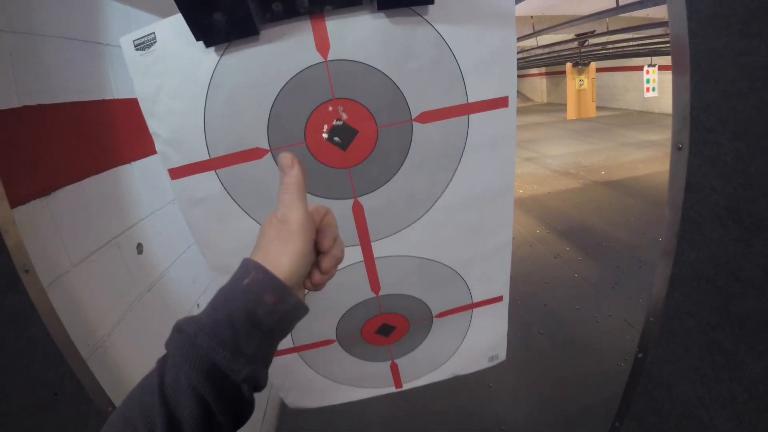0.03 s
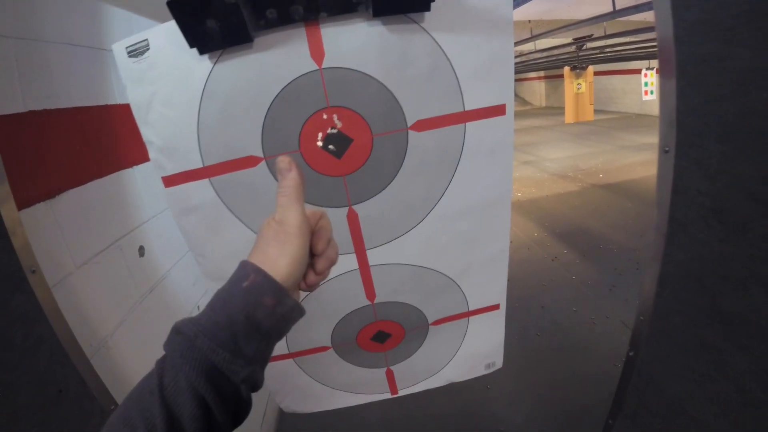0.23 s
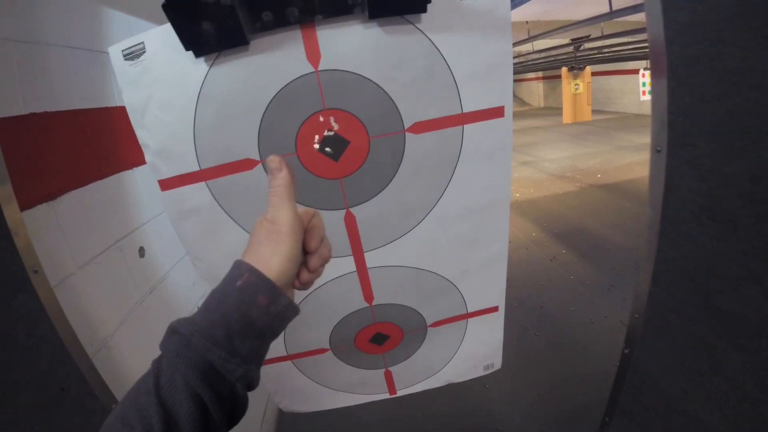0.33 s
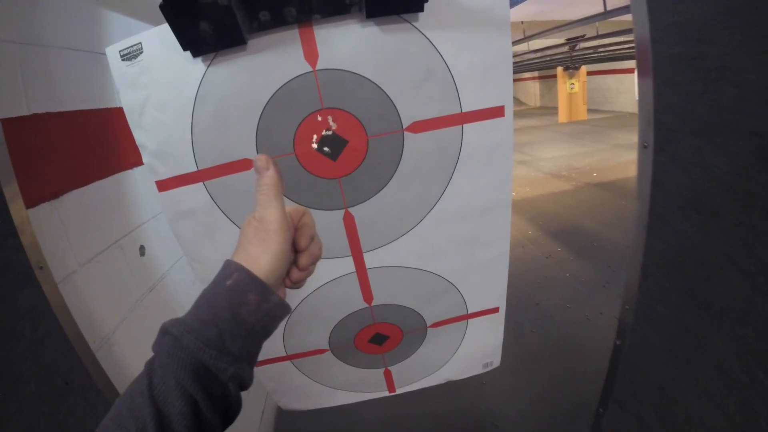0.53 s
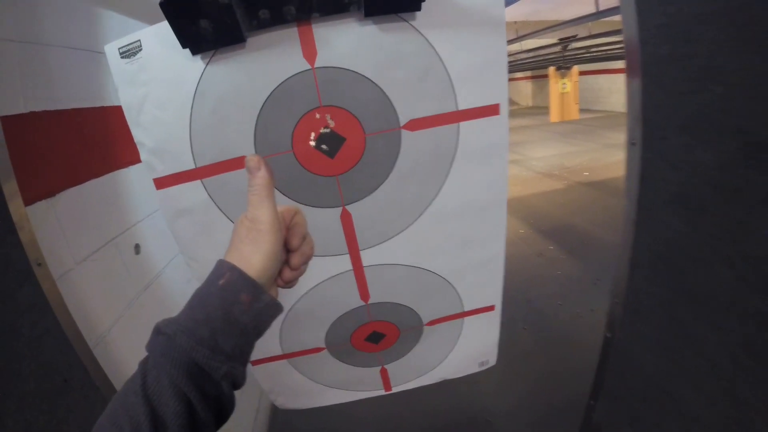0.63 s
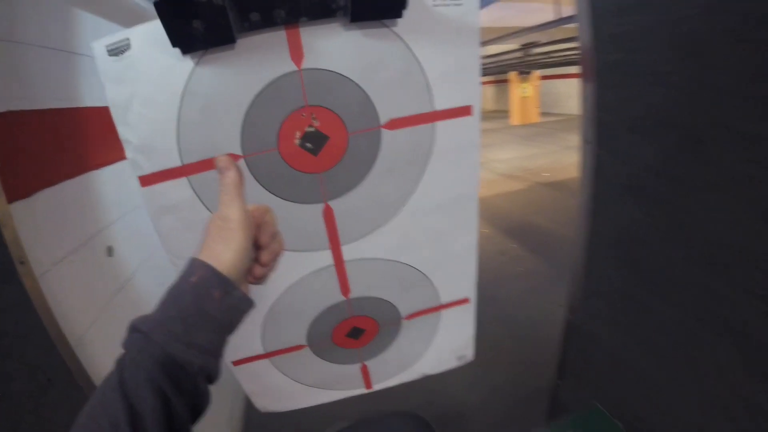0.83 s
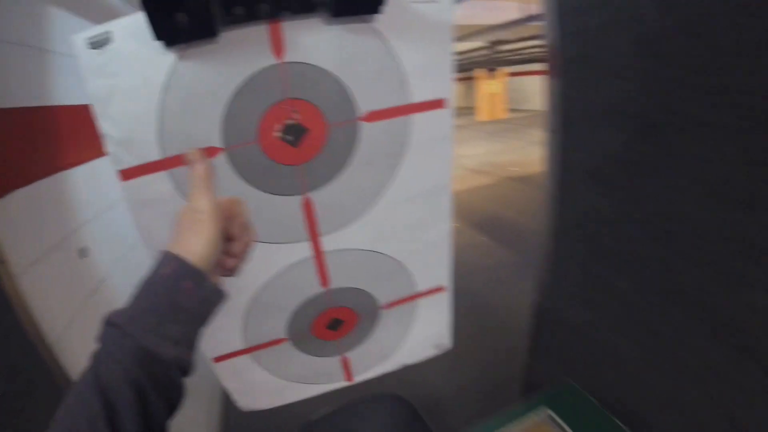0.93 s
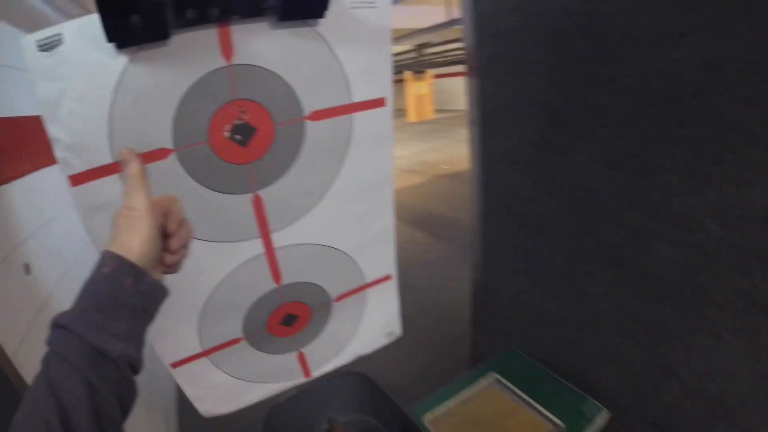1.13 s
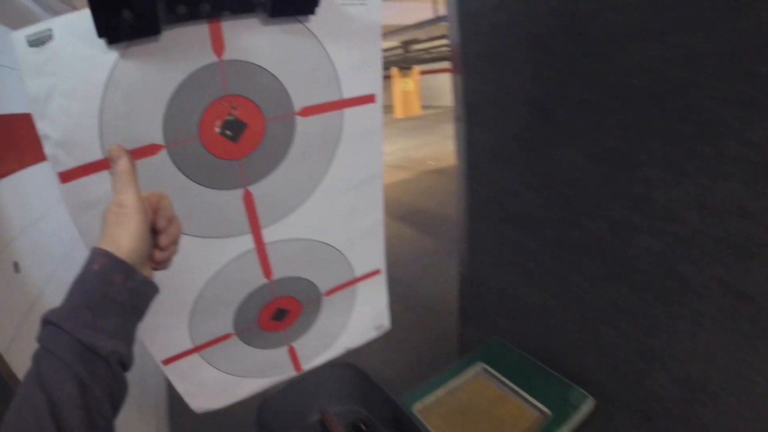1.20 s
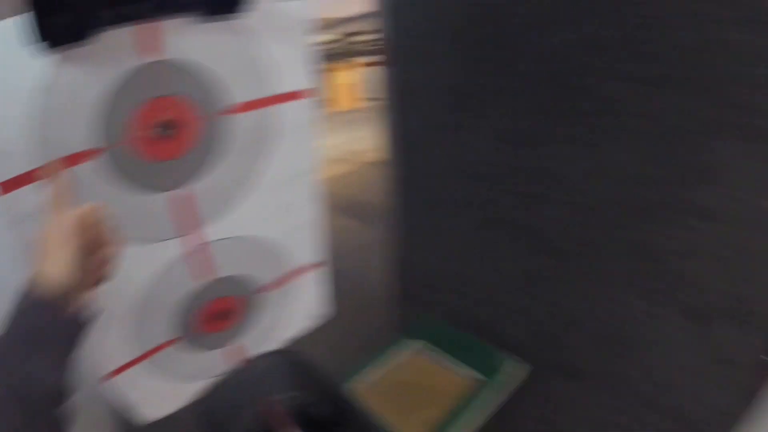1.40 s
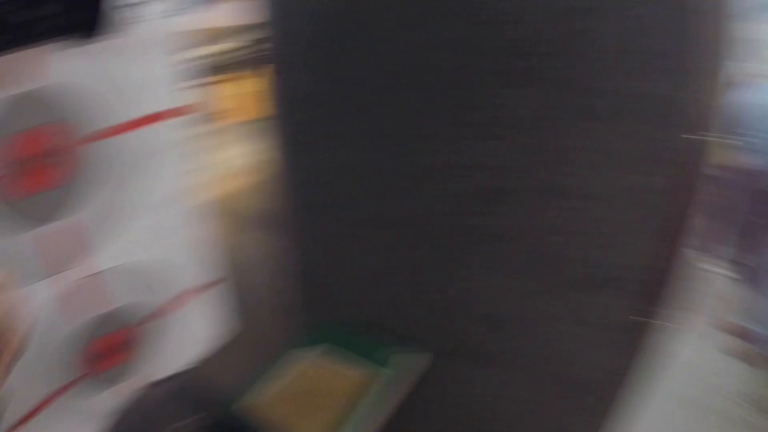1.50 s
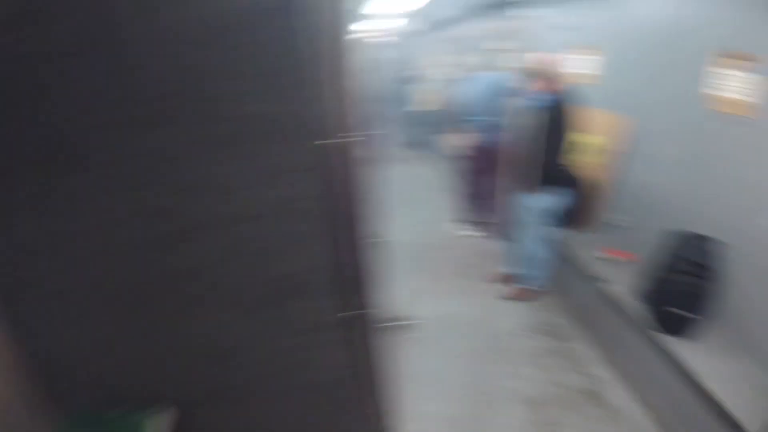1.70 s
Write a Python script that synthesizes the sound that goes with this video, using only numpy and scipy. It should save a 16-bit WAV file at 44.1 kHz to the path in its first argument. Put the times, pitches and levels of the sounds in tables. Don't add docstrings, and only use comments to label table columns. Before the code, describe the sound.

Single gunshot in an echoing indoor shooting hall, heard on a small camera: first low air rumble, faint motor whine and metallic clacks, then a hard click, the blast, wall echoes and a long fading tail.

```python
import sys
import numpy as np
from scipy import signal
from scipy.io import wavfile
from scipy.ndimage import uniform_filter1d

SR = 44100
rng = np.random.default_rng(int(sys.argv[2]) if len(sys.argv) > 2 else 0)


def decibels_to_gain(level_db):
    exponent = np.asarray(level_db, float) / 20
    return 10 ** exponent


def inscribe(sig):
    pcm = np.round(np.clip(np.atleast_2d(sig).T, -1, 1) * 32767)
    wavfile.write(sys.argv[1], SR, pcm.astype(np.int16))


N = 77175

# (frequency [Hz], level [dB per Hz])
VENTILATION = [(25, 6), (55, 6.5), (95, -4.5), (170, -15.5), (330, -29), (1000, -30), (3900, -44),
               (16000, -72)]
# (time [s], level [dB])
DRAUGHT = [(0, 2), (.11, -6.5), (.22, 3.5), (.38, -3.5), (.49, 2.5), (.58, -5), (.68, 0.5), (.73, -0.5),
           (1.4, -1.5), (1.7, 7.5)]
# (time [s], level [dB])
DRIVE_LOAD = [(0.0, -53.5), (0.076, -57.5), (0.146, -62), (0.208, -56), (0.23, -61), (0.328, -52),
              (0.506, -60.5), (0.542, -51.5), (0.74, -59)]
# (multiple of the fundamental [1], level [dB])
WHINE_PARTIALS = [(1, 2), (2, -7.5), (3, -30.5)]
# (multiple of the fundamental [1], level [dB])
SQUEAK_PARTIALS = [(.2, -53), (1, -52.5), (2, -56.5), (3, -58.5)]
# (time [s], level [dB])
CLACKS = [
    (0.0478, -23),
    (0.188, -31.5),
    (0.249, -31.5),
    (0.36, -18.5),
    (0.492, -33),
    (0.6823, -27),
]
# (frequency [Hz], level [dB], decay t60 [s])
CARRIER_MODES = [(1138, 3.5, 0.077), (1110, -14, 0.056), (1943, 0, 0.081), (2040, -3, 0.053),
                 (2436, -4, .05), (2790, -3.5, 0.038), (3430, -8, 0.074), (5580, -14, 0.032),
                 (6255, -4, .05), (10900, -48, 0.027)]
# (time [s], level [dB], share of dull knock [1])
LATCH_TICKS = [
    (.5975, -42, 0),
    (.6202, -17, .03),
    (.6211, -7, .04),
    (.6222, -20, .02),
    (.6239, -13, .08),
    (.6255, -5, .12),
    (.6272, -15, .08),
    (.6303, -15, 1.1),
]
# (frequency [Hz], level [dB], decay t60 [s])
LATCH_MODES = [(3050, -9, .004), (4640, -12, .004), (5360, -3, .005), (5950, -1, .005), (8150, -1, .004),
               (9780, -6, .003), (11600, -5, .003), (13400, -4, .003), (15000, -10, .003)]
# (frequency [Hz], level [dB], decay t60 [s])
KNOCK_MODES = [(922, -3.5, 0.025), (1290, -4, 0.011), (1900, -18, 0.0055)]
# (time [s], level [dB])
SPRING_SETTLE = [
    (.633, -63),
    (.651, -45.5),
    (0.655, -50),
    (.659, -44.5),
]
# (frequency [Hz], level [dB], decay t60 [s])
BLAST_BOOM = [(59.5, 10, 0.48), (80.6, 6.5, 0.31), (110.3, 1, 0.27), (150, 0, 0.22), (300.5, 2.5, 0.65)]
# (frequency [Hz], level [dB], decay t60 [s])
RETURN_BOOM = [(72.4, 1.5, 0.41), (119.7, 6, .6), (149.1, 7.5, 0.85), (185, -9, 0.36), (252.8, 5.5, 0.55),
               (329.7, 3.5, .4)]
# (frequency [Hz], first-arrival level [dB], hall level [dB], hall decay t60 [s], hall build-up [s])
SHOT_BANDS = [(35, -17.5, -29, 0.78, .03), (112, -19.5, -18, 1.46, 0.013), (353, -10.5, -17.5, 1.5, 0.049),
              (815, -11, -9.5, 1.667, 0.034), (1640, -12, -16.5, 1.55, .025),
              (3700, -31, -24.5, 0.89, 0.036), (7030, -35.5, -33, 0.36, .035),
              (14000, -57, -53.5, .5, 0.036)]
# (delay [s], level [dB])
WALL_RETURNS = [
    (0.133, -1.5),
    (0.299, -7),
]
# (time [s], level [dB])
CAMERA_GAIN = [(0, 0.5), (.2, 0), (.6, 3.5), (.738, 5.5), (.765, -15.5), (.85, -15.5), (1.0, -15.5),
               (1.18, -18.5), (1.3, -23), (1.5, -22.5), (1.75, -20.5)]

SHOT_S = 0.7348
CLACK_RISE_S, CLACK_HOLD_S = 0.0047, 0.028


def curve(table, x, log=False):
    columns = np.array(table, float).T
    scale = np.log if log else np.asarray
    return [np.interp(scale(x), scale(columns[0]), column) for column in columns[1:]]


def unit(x):
    return x / np.sqrt(np.mean(x ** 2))


def band_noise(hz, width):
    edges = [hz - width / 2, min(hz + width / 2, SR * 0.49)]
    sos = signal.butter(2, edges, "band", fs=SR, output="sos")
    return unit(signal.sosfilt(sos, rng.standard_normal(N)))


def walk(rate):
    hold = int(SR / rate)
    steps = np.repeat(rng.standard_normal(N // hold + 1), hold)
    return 1.86 * uniform_filter1d(uniform_filter1d(steps, hold), hold)[:N]


def ring(push, modes):
    out = 0
    for hz, db, t60 in modes:
        pole = np.exp(2j * np.pi * hz / SR - np.log(1000) / (t60 * SR))
        out = out + decibels_to_gain(db) * signal.lfilter([1], [1, -pole], push + 0j).imag
    return out


def swell(age, rise, t60):
    return np.clip(age / rise, 0, 1) ** 2 * decibels_to_gain(-60 * np.maximum(age - rise, 0) / t60)


def thirds():
    return 25 * 2 ** (np.arange(29) / 3)


def ventilation(t):
    gust, out = curve(DRAUGHT, t)[0], 0
    for hz in thirds():
        db = curve(VENTILATION, hz, True)[0] + 10 * np.log10(hz)
        db = db + gust / (1 + (hz / 196.15) ** 2) + 0.5 * walk(11.8)
        out = out + decibels_to_gain(db) * band_noise(hz, hz * 0.2)
    return decibels_to_gain(-23) * unit(out)


def unsteady_tone(hz, db):
    wavering_hz = hz * (1 + 0.0004 * walk(32))
    return decibels_to_gain(db) * np.sqrt(2) * np.sin(2 * np.pi * np.cumsum(wavering_hz) / SR)


def drive_whine(t):
    whine_hz, stop_s, fade_db_s = 4000, 0.88, -23
    out = 0
    for multiple, db in WHINE_PARTIALS:
        load = curve(DRIVE_LOAD, t)[0] if multiple == 1 else -53.5 + fade_db_s * t
        out = out + unsteady_tone(whine_hz * multiple, db + load + 3 * walk(27))
    return out * (t < stop_s)


def wheel_squeak(t):
    squeak_hz, middle_s, width_s = 3224, 0.27, 0.065
    out = 0
    for multiple, db in SQUEAK_PARTIALS:
        width = width_s * (2.3 if multiple <= 1 else 1)
        hump = np.exp(-((t - middle_s) / width) ** 2)
        out = out + unsteady_tone(squeak_hz * multiple, db + 4 * walk(34)) * hump
    return out


def joint_shake(t, tau, hold):
    out = 0
    for start, db in CLACKS:
        age = np.maximum(t - start + CLACK_RISE_S, 0)
        rise = 1 - np.exp(-age / CLACK_RISE_S)
        out = out + decibels_to_gain(db) * rise * np.exp(-np.maximum(age - hold, 0) / tau)
    return out


def carrier_clacks(t):
    rattle = rng.standard_normal(N) * decibels_to_gain(1.6 * walk(300))
    steady = ring(rattle, CARRIER_MODES)
    struck = ring(rattle * joint_shake(t, 0.012, 0.0027), CARRIER_MODES)
    lingering = decibels_to_gain(-5.5) * steady * joint_shake(t, 0.043, CLACK_HOLD_S)
    body = (struck + lingering) / np.std(steady)
    low_wash = decibels_to_gain(-2) * band_noise(2434, 2740) * joint_shake(t, 0.066, CLACK_HOLD_S)
    high_wash = decibels_to_gain(-13) * band_noise(7100, 9000) * joint_shake(t, 0.018, CLACK_HOLD_S)
    wash = (low_wash + high_wash) * decibels_to_gain(1.46 * walk(91.77))
    return decibels_to_gain(-11) * (body + decibels_to_gain(-4.5) * wash)


def latch(t):
    lead, tick_samples = 8, 9.8
    bright, dull = np.zeros(N), np.zeros(N)
    for start, db, knock_share in LATCH_TICKS:
        i = int(start * SR) - lead
        signs = np.sign(rng.standard_normal(80))
        k = np.arange(80) / tick_samples
        bright[i:i + 80] += decibels_to_gain(db) * signs * k * np.exp(1 - k)
        dull[i + lead] += decibels_to_gain(db) * knock_share

    fizz = decibels_to_gain(-50.5) * (t > 0.63) * np.exp(-np.maximum(t - 0.63, 0) / 0.055)
    for start, db in SPRING_SETTLE:
        fizz = fizz + decibels_to_gain(db) * (t > start) * np.exp(-np.maximum(t - start, 0) / 0.0017)
    snap = decibels_to_gain(-19) * ring(bright, LATCH_MODES) + decibels_to_gain(-37) * bright
    return snap + ring(dull, KNOCK_MODES) + fizz * band_noise(12000, 8000)


def pressure_push(t, delay):
    width_s = 0.0025
    return np.exp(-((t - SHOT_S - delay) / width_s) ** 2 * 8) / (width_s * SR / 2)


def hall_boom(t):
    blast_s, return_s = 0.024, 0.155
    returned = pressure_push(t, return_s) + 0.39 * pressure_push(t, return_s + 0.03)
    boom = ring(pressure_push(t, blast_s), BLAST_BOOM) + ring(returned, RETURN_BOOM)
    return decibels_to_gain(-2) * boom


def shot(t):
    first_rise_s, first_t60_s, far_t60_ratio = 0.028, 0.29, 3.66
    bass_late_s, bass_hz, return_hz = 0.021, 780, 800
    blast_s, grain_db = 0.0004, 0.8
    age, hall = t - SHOT_S, 0
    lumps = walk(69.15) * np.exp(-np.maximum(age, 0) / 0.19)

    for hz in thirds():
        first_db, hall_db, t60, build = curve(SHOT_BANDS, hz, True)
        lag = bass_late_s / (1 + (hz / bass_hz) ** 2)

        first = 0
        for delay, db in [(0, 0), (0.034, -4.5)]:
            arrival = swell(age - delay - lag, first_rise_s - lag / 2, first_t60_s)
            first = first + decibels_to_gain(2 * db) * arrival ** 2
        late = 0
        for delay, db in [(0, 0.0049)] + list(WALL_RETURNS):
            dulling = 1 + (delay > 0) * (hz / return_hz) ** 2
            echo = swell(age - delay - lag, max(build - lag, 0.004), t60)
            late = late + decibels_to_gain(2 * db) / dulling * echo ** 2
        far = decibels_to_gain(-12) * swell(age - lag, build, far_t60_ratio * t60 / 2)

        shape = np.sqrt(decibels_to_gain(2 * first_db) * first + decibels_to_gain(2 * hall_db) * (late + far ** 2))
        grain = decibels_to_gain(grain_db * (lumps + 1.1 * walk(30.26)))
        hall = hall + shape * grain * band_noise(hz, hz * 0.23)

    blast = np.linspace(1, -0.3, max(int(blast_s * SR / 4), 2))
    return decibels_to_gain(18.5 - 11) * np.convolve(hall, blast / np.sum(blast))[:N]


def scene():
    t = np.arange(N) / SR
    background = ventilation(t) + drive_whine(t) + wheel_squeak(t)
    return (background + carrier_clacks(t) + latch(t) + hall_boom(t) + shot(t))[None]


def camera_noise(t):
    hiss = decibels_to_gain(-69) * rng.standard_normal(N)
    tone_db = -65.5 + 2.5 * np.cos(2 * np.pi * (t - 1.34) / 0.24) + walk(20)
    return hiss + decibels_to_gain(tone_db) * np.sqrt(2) * np.sin(2 * np.pi * 3348 * t)


def band_limit(x):
    return signal.sosfilt(signal.butter(12, 16520, fs=SR, output="sos"), x)


def record(dry):
    t = np.arange(N) / SR
    limit = 0.95
    rumble_cut = signal.butter(2, 28, "high", fs=SR, output="sos")
    ceiling = signal.ellip(8, 0.2, 60, 16000, fs=SR, output="sos")
    x = signal.sosfilt(rumble_cut, dry) * decibels_to_gain(curve(CAMERA_GAIN, t)[0])
    x = x / (1 + (x / limit) ** 4) ** 0.25
    mix = signal.sosfilt(ceiling, x + camera_noise(t))
    return band_limit(mix)


dry = scene()
out = record(dry)
inscribe(out)
```